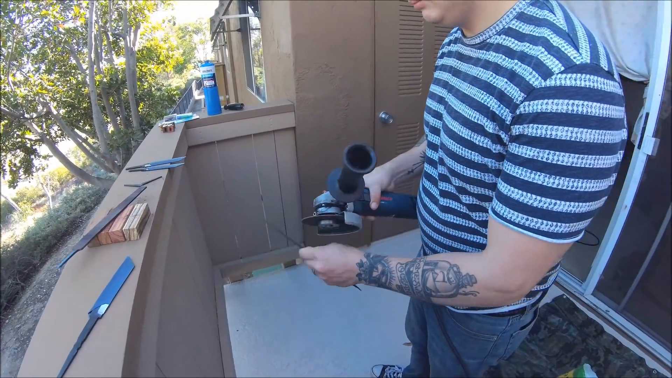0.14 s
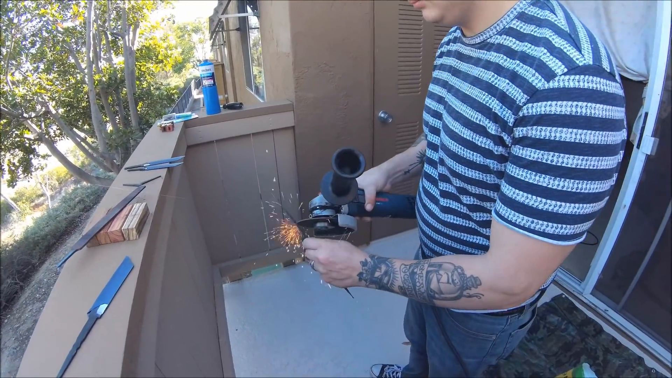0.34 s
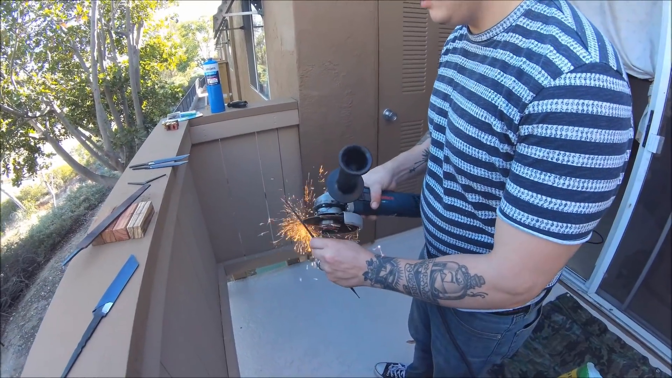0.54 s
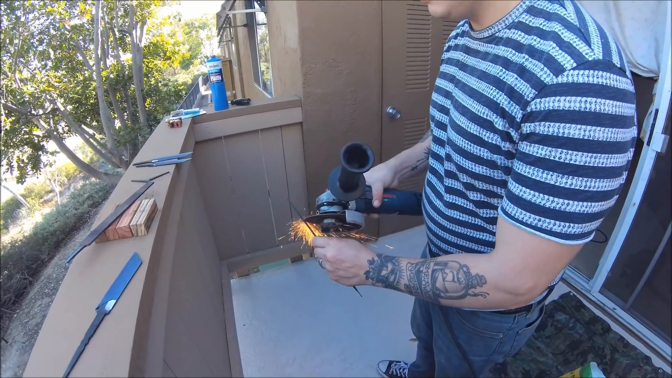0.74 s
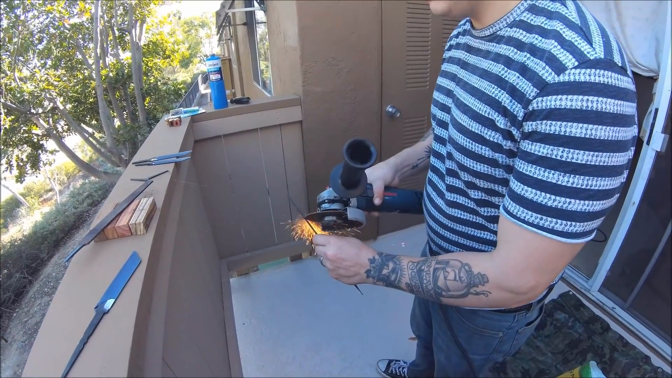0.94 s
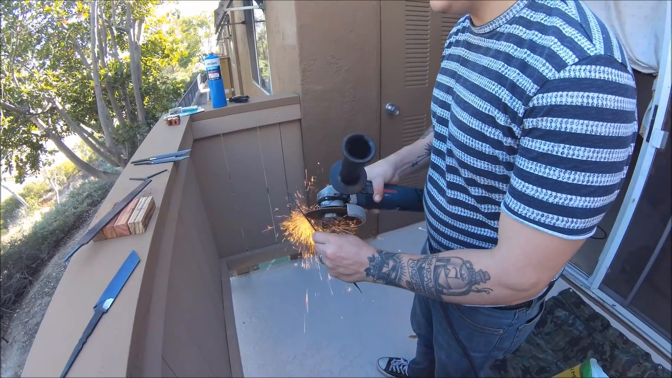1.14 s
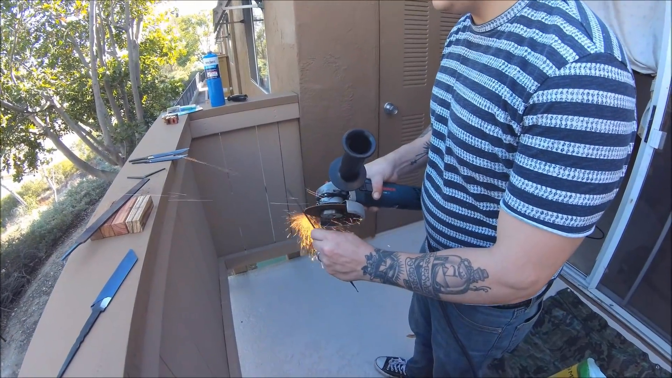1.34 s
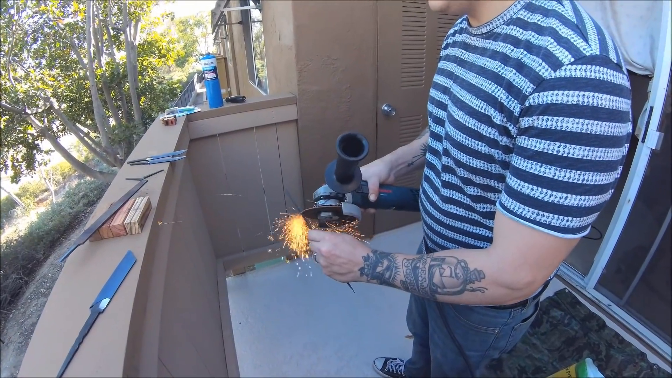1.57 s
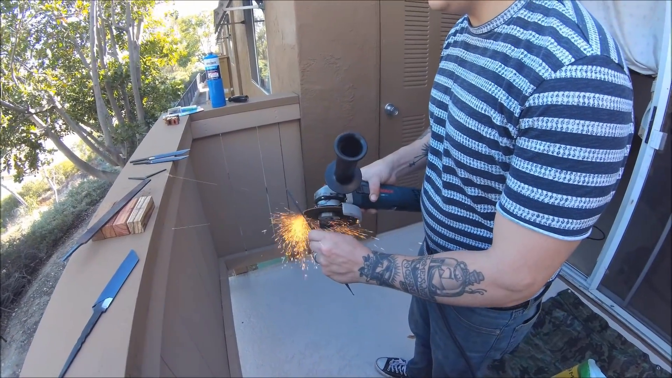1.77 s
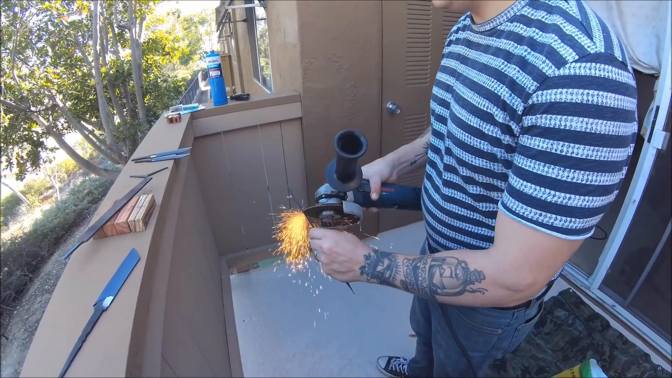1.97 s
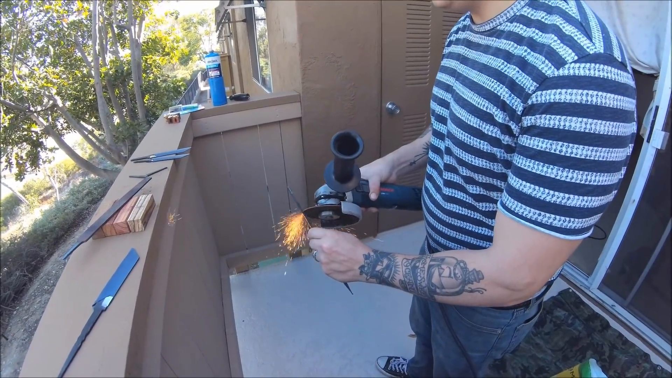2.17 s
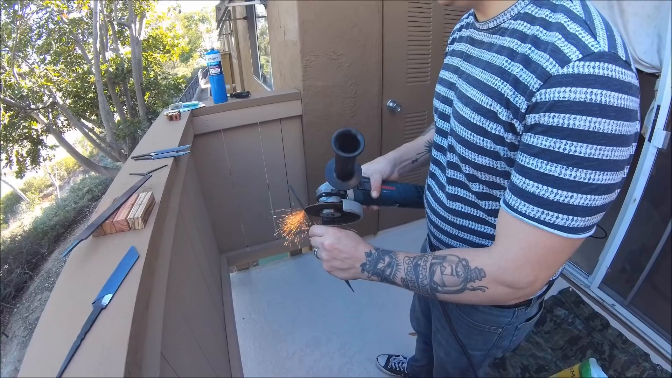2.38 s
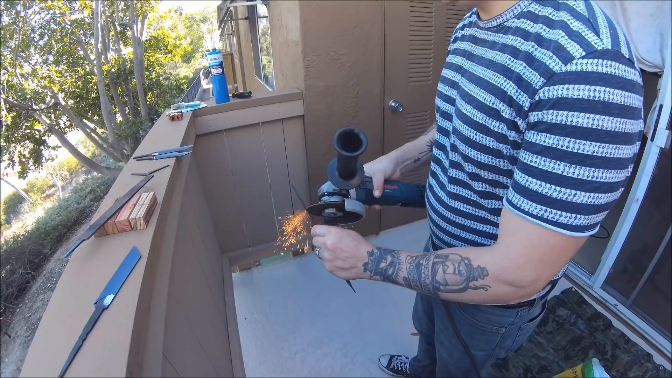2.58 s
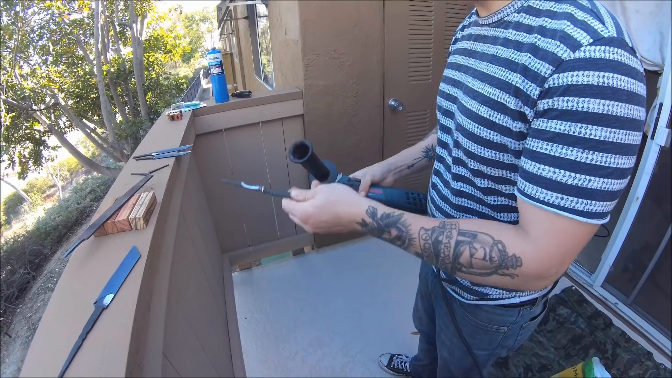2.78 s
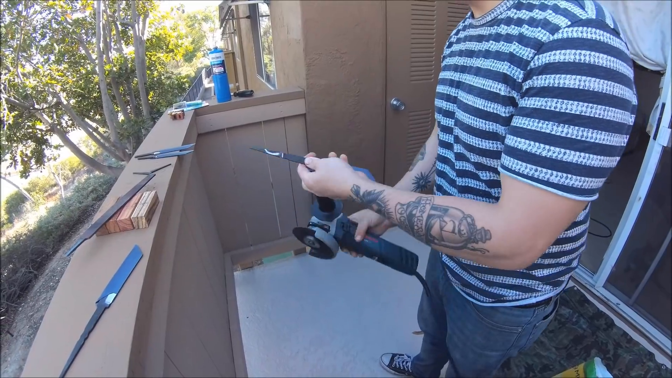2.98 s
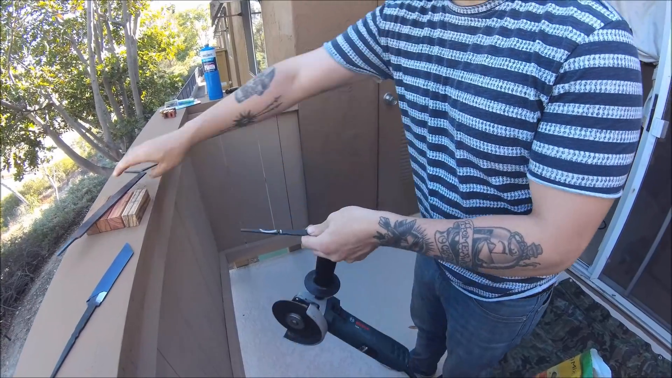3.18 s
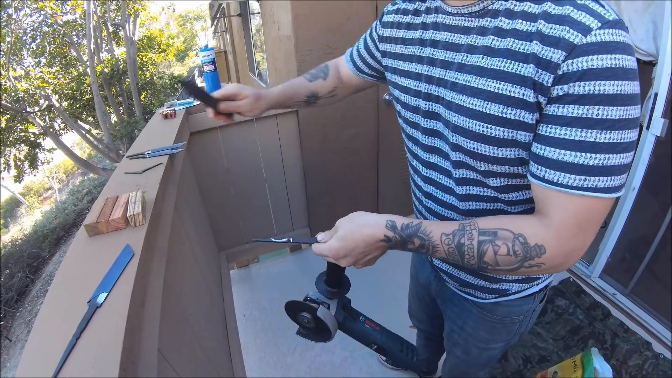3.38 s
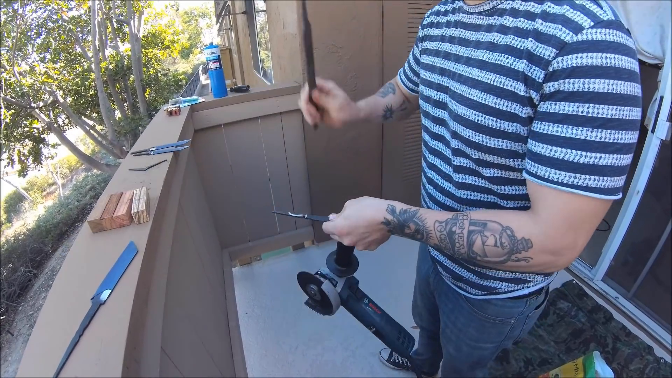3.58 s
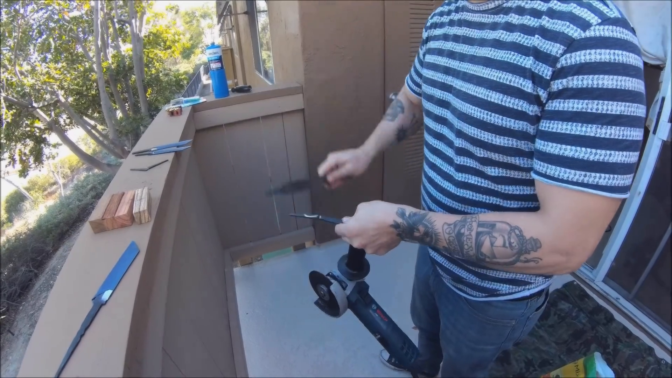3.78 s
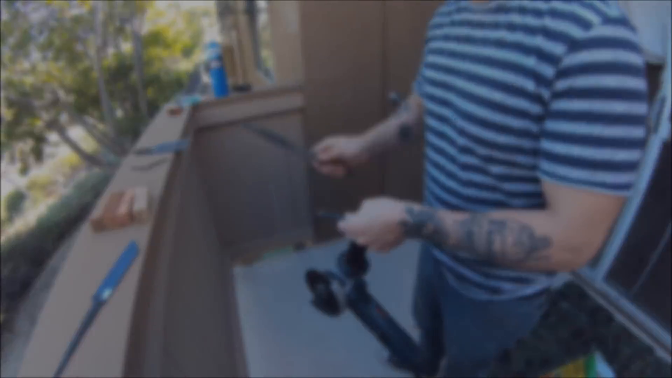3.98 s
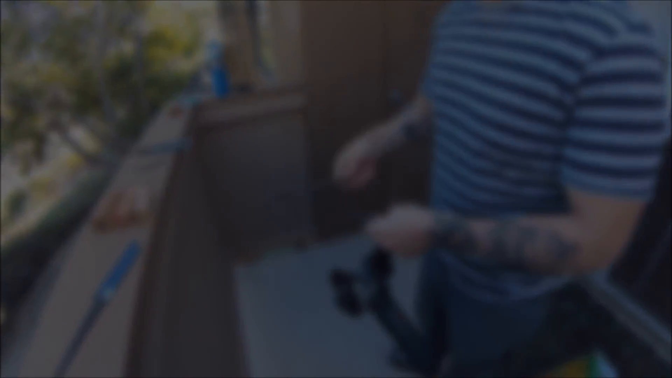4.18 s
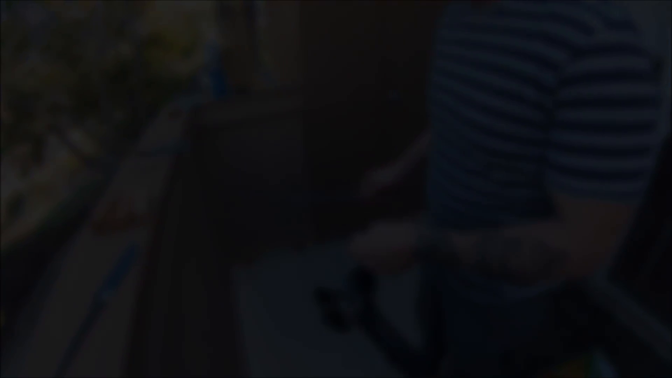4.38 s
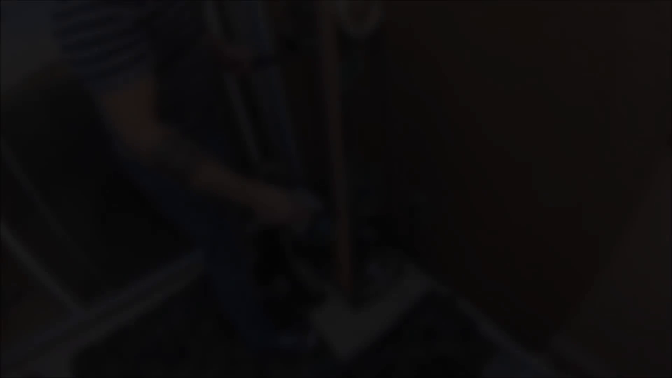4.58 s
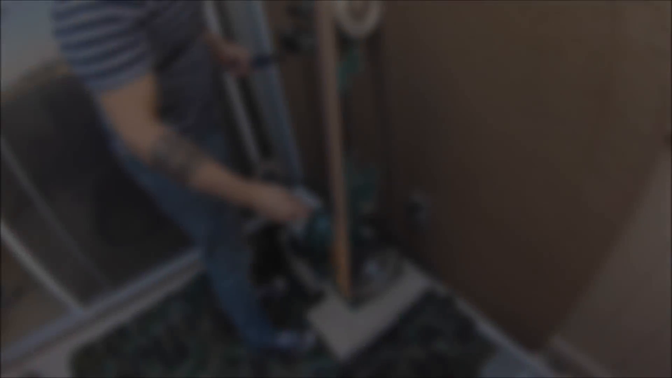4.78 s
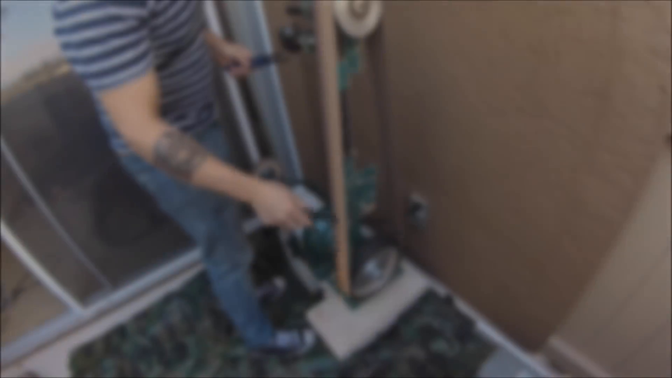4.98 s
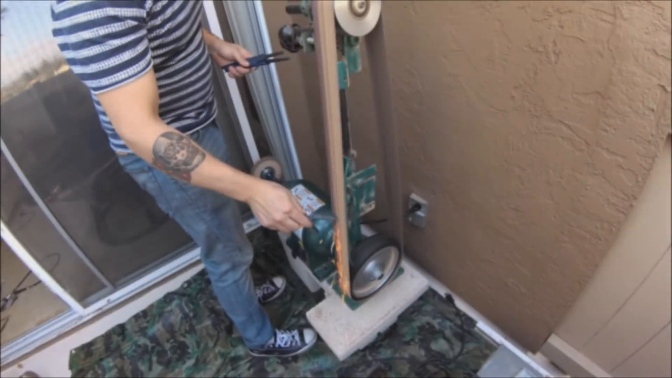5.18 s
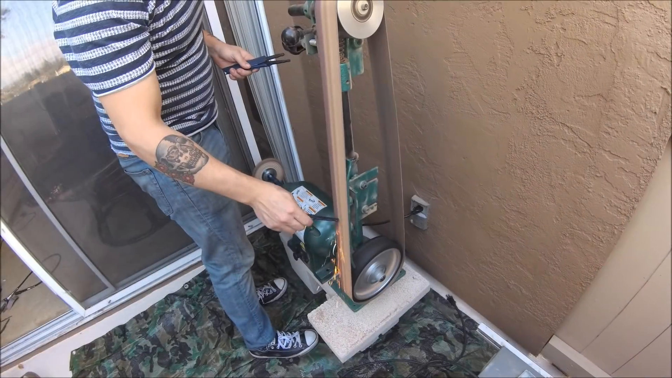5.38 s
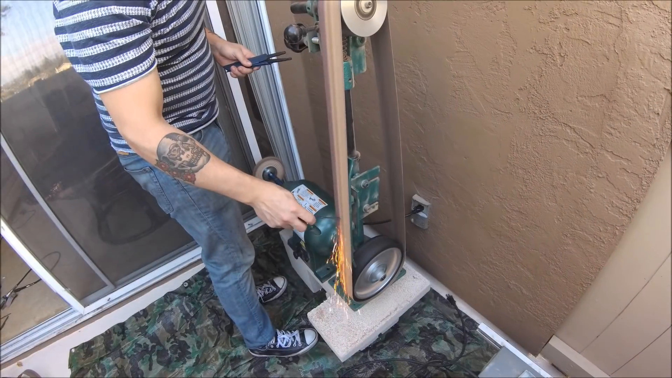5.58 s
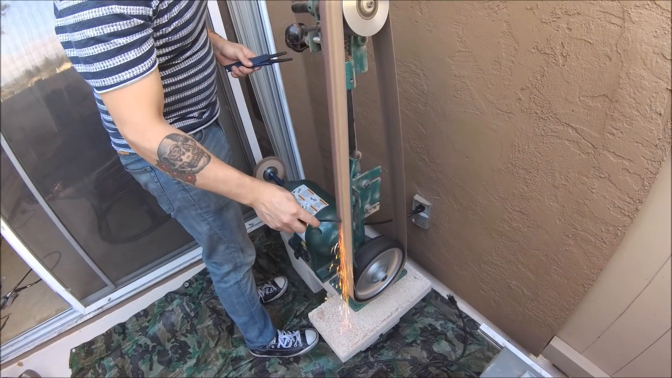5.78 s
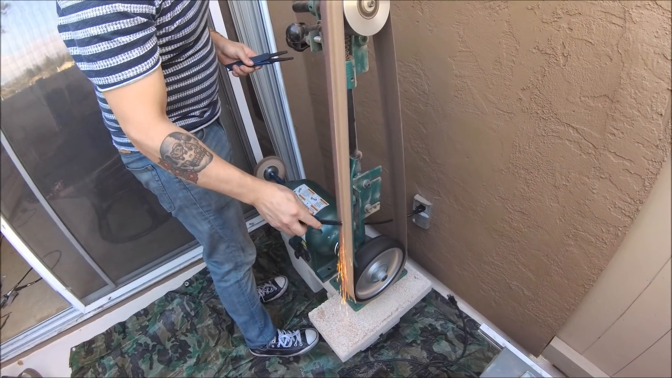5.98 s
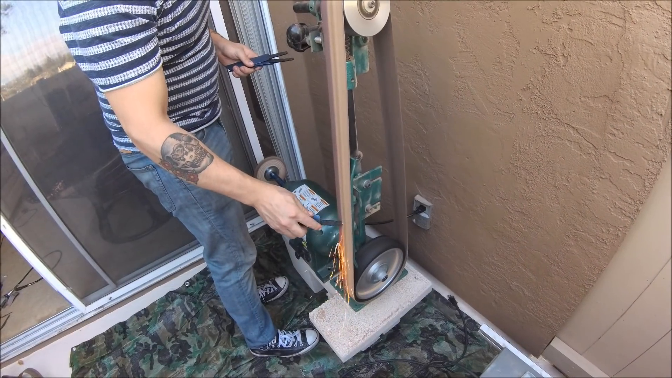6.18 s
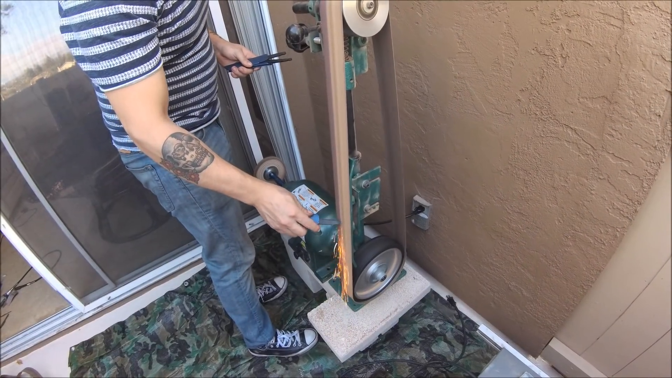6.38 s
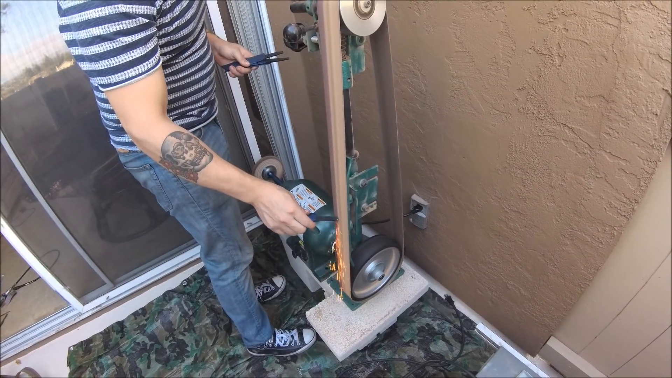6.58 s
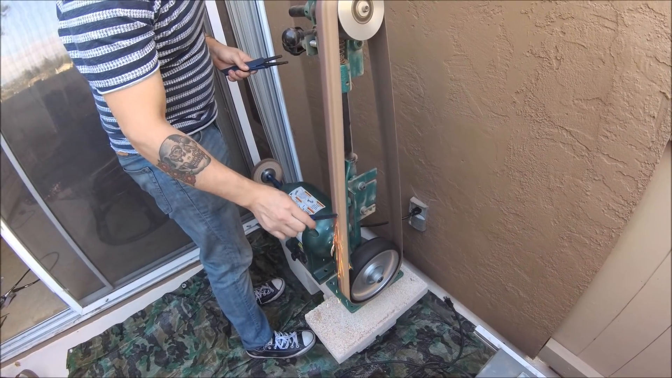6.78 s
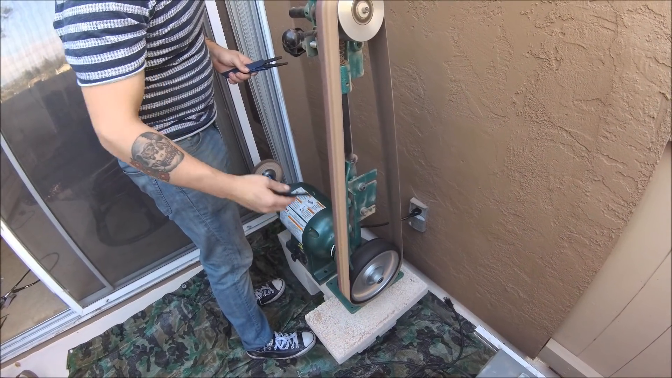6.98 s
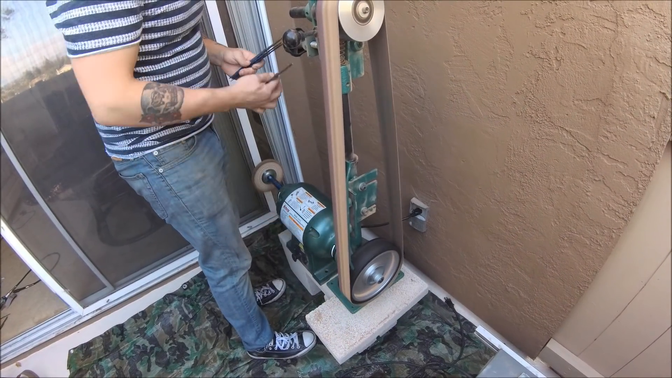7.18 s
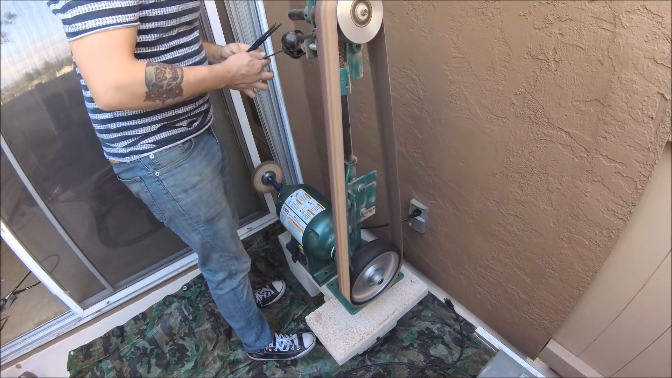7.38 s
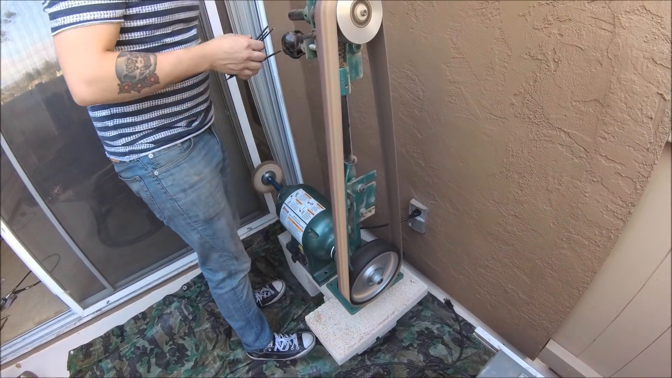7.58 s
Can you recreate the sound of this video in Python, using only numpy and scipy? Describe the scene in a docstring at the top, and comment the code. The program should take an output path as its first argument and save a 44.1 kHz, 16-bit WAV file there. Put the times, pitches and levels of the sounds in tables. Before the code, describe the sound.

Roaring, sizzling metal cutting runs down in a falling whistle, quick bright ticks sound outdoors, then a hissing belt grinder sings against steel and runs free.

```python
"""Angle grinder, ticks and belt grinder

On a small balcony an angle grinder bites into steel with a whine, roar and sizzle, then is switched off and runs down.
Its tones follow the armature's speed; the cutting and the coasting are coloured noise.
Sharp ticks and two dull clacks are noise bursts with a short ring, over soft open air, a faint hum and a distant bird.
A belt grinder fades in as wheel tones and noise; steel roars and sings on its belt, is lifted, and the belt runs on."""
import sys
import numpy as np
from scipy import signal
from scipy.fft import rfft, irfft
from scipy.io import wavfile
from scipy.ndimage import uniform_filter1d

SR = 44100
rng = np.random.default_rng(int(sys.argv[2]) if len(sys.argv) > 2 else 0)


def unload_wav(signal):
    """Save mono or channel-first audio to the path in sys.argv[1] as 16-bit WAV at rate SR, clipped to [-1, 1]."""
    wavfile.write(
        sys.argv[1],
        SR,
        np.round(np.clip(np.atleast_2d(signal).T, -1, 1) * 32767).astype(np.int16),
    )


N = 336924
T = np.arange(N) / SR
FREQ = np.fft.rfftfreq(N, 1 / SR)
TOP_HZ = 15750  # upper edge of the whole sound


def undb(db):
    """Decibels to gain."""
    return 10 ** (np.asarray(db) / 20)


def curve(rows, rise=600, fall=600):
    """Gain over time from (time [s], level [dB]) rows, dying away outside them at rise and fall [dB/s]."""
    s, db = np.transpose(rows)
    before = rise * np.maximum(s[0] - T, 0)
    after = fall * np.maximum(T - s[-1], 0)
    return undb(np.interp(T, s, db) - before - after)


def swells(rows):
    """Gain of smooth swells and dips from (middle [s], length [s], change [dB]) rows."""
    return undb(sum(db * np.cos(np.pi * np.clip((T - s) / length, -.5, .5)) ** 2 for s, length, db in rows))


def across(points):
    """Join (frequency [Hz], value) points on a log-frequency axis."""
    f, value = np.transpose(points)
    return np.interp(np.log(FREQ + 1), np.log(f), value)


def bell(hz, centre_hz, width):
    """Resonance curve: 1 at the centre, a half at half the width [Hz] to either side."""
    return 1 / (1 + (2 * (hz - centre_hz) / width) ** 2)


def resonances_db(rows):
    """Boost in dB over frequency from (centre [Hz], width [Hz], boost [dB]) resonances."""
    return sum(db * bell(FREQ, hz, width) for hz, width, db in rows)


def walk(rate):
    """Smooth random drift with a spread near 1, taking rate [Hz] new values a second."""
    step = int(SR / rate)
    count = N // step + 2
    line = np.interp(T, np.arange(count) * step / SR, rng.standard_normal(count))
    return np.sqrt(2) * uniform_filter1d(line, step)


def grit(colour_db, like, band, grain_db=0., gate=1.):
    """Stereo hiss of countless grain strikes of uneven size; the centre has rms 1 within the band [Hz]."""
    sizes = undb(grain_db * rng.exponential(size=N))
    strikes = rng.standard_normal((2, N)) * sizes * gate
    mid, side = rfft(strikes) * undb(colour_db)
    # likeness of left and right: 0 is unrelated, 1 is identical
    like = np.clip(like, 0, 1)
    mid, side = mid * np.sqrt(1 + like), side * np.sqrt(1 - like)
    inside = (FREQ > band[0]) & (FREQ < band[1])
    return irfft([mid + side, mid - side], N) / np.std(irfft(mid * inside, N))


def place(x, pan_db):
    """Lean a sound left (positive) or right."""
    return x * undb(np.array([[pan_db], [-pan_db]]) / 2)


def add(out, s, sound):
    """Mix a short sound in at a time [s]."""
    start = int(s * SR)
    out[:, start:start + sound.shape[1]] += sound


# colour of the outdoor air: (frequency [Hz], level [dB])
AIR_COLOUR = [(20, -75), (160, -62), (250, -20), (340, -4.5), (500, -3.5), (1300, -0.5), (3000, 2.5),
              (6000, -0.5), (8000, -8.5), (11000, -9), (16000, -15)]


def open_air(air_db=-38.5):
    """Soft outdoor air: almost steady noise, alike in both ears."""
    return grit(across(AIR_COLOUR), 1.0, (200, 15000)) * undb(air_db + 0.53 * walk(7))


# calls of the distant bird: (time [s], length [s], start pitch [Hz], end pitch [Hz], level [dB])
BIRD_CALLS = [(3.49, .11, 680, 880, -46), (3.49, .09, 1430, 1320, -47), (3.68, .11, 1390, 1320, -43),
              (3.7, .22, 770, 800, -54), (3.89, .1, 1400, 1450, -46), (4.02, .11, 1430, 1330, -43)]


def bird(overtone_db=-8):
    """Slurred whistles of a distant bird: gliding tones with one overtone."""
    out = np.zeros(N)
    for s, length, start_hz, end_hz, db in BIRD_CALLS:
        progress = np.clip((T - s) / length, 0, 1)
        phase = 2 * np.pi * np.cumsum(start_hz + (end_hz - start_hz) * progress) / SR
        tone = np.sin(phase) + undb(overtone_db) * np.sin(2 * phase)
        out += undb(db) * np.sqrt(2) * np.sin(np.pi * progress) * tone
    return out


# partials of the distant hum: (frequency [Hz], level [dB])
HUM_PARTIALS = [(393, -61), (522, -61), (646, -66), (776, -60), (1174, -59)]


def far_hum(start_s=3.72, end_s=4.1, waver_db=3.0):
    """A faint hum in the distance comes and goes, its partials wavering separately in level, together in pitch."""
    time = np.cumsum(1 + .004 * walk(12)) / SR
    hum = 0
    for hz, db in HUM_PARTIALS:
        hum = hum + undb(db + waver_db * walk(12)) * np.sqrt(2) * np.sin(2 * np.pi * hz * time)
    return hum * curve([(start_s, 0), (end_s, 0)], rise=56, fall=40)


WHEEL_HZ = 52.45  # average speed of the drive wheel, turns per second
# drive wheel harmonics, running free: (multiple of its speed, level [dB])
WHEEL_HARMONICS = [(4, -57), (5, -51.5), (6, -62), (8, -55.5), (9, -54.5), (10, -57), (11, -60), (13, -53),
                   (15, -62), (17, -63), (22, -63), (38, -56), (40, -60)]


def wheel_hum(load, damped_db=-9):
    """The drive wheel's hum and its angle; the load of the steel damps the hum."""
    turn = 2 * np.pi * WHEEL_HZ * np.cumsum(1 + 0.00099 * walk(6)) / SR
    hum = 0
    for k, db in WHEEL_HARMONICS:
        tone = np.sin(k * turn + rng.uniform(0, 2 * np.pi))
        hum = hum + undb(db + 1.1 * walk(8.5)) * np.sqrt(2) * tone
    return hum * undb(damped_db * load), turn


# the blade sings as its grip and angle change: (start [s], end [s], centre [Hz], width [Hz], level [dB])
BLADE_SONG = [(4.65, 5.25, 9600, 300, -33.5), (5, 5.801, 13600, 400, -35), (5, 5.7, 12020, 350, -40),
              (5.65, 6.8, 8980, 120, -33), (5.7, 6.85, 7380, 130, -34.5), (6.0, 6.7, 13320, 250, -39),
              (6.45, 7.03, 13680, 500, -34)]


def blade_song():
    """The belt's grains keep narrow resonances of the blade ringing, each swelling and dying."""
    out = 0
    for start, end, hz, width, db in BLADE_SONG:
        progress = np.clip((T - start) / (end - start), 0, 1)
        swell = np.sqrt(np.abs(np.sin(np.pi * progress)))
        ringing = grit(20 * np.log10(bell(FREQ, hz, width)), .4, (0, TOP_HZ))
        out = out + undb(db) * swell * ringing
    return out


# colour of the free-running belt: (frequency [Hz], level [dB])
BELT_COLOUR = [(18, -62), (30, -32), (108, -21), (130, -20.5), (197, -16.5), (263, -17), (292, -19),
               (691, -14), (852, -15.5), (1290, -20), (2020, -19), (3590, -13.5), (4310, -7), (7650, -2.5),
               (15500, -4)]
# idler wheels under the running belt: (centre [Hz], width [Hz], boost [dB])
IDLER_RESONANCES = [(4270, 290, 2.5), (6230, 380, 4.5), (7470, 180, 7), (12100, 400, 3)]
# likeness of left and right in the belt noise: (frequency [Hz], likeness [0-1])
BELT_LIKENESS = [(3000, 0.9), (6500, 0.95), (10000, 0.25), (14000, .14)]


def running_belt(wobble, load, belt_db=-24, damped_db=-3, flicker_db=0.5):
    """The belt hisses over its idlers, pulsing with the wheel; the steel's load damps it."""
    colour_db = across(BELT_COLOUR) + resonances_db(IDLER_RESONANCES)
    belt = grit(colour_db, across(BELT_LIKENESS), (30, 15500), gate=wobble) * undb(flicker_db * walk(40))
    return undb(belt_db + damped_db * load) * place(belt, -.3)


# how hard the steel is held on the belt until it is lifted at the last row: (time [s], pressure [dB])
STEEL_PRESSURE = [(4.9, -0.5), (5.3, 0.5), (5.8, -1.5), (6.75, 1.5), (6.92, 2.5), (6.98, 0)]
# colour of the grinding roar: (frequency [Hz], level [dB])
GRIND_ROAR_COLOUR = [(20, 2.5), (100, 0.85), (1000, 0.65), (3000, 2.1), (5000, 1.2), (9000, 1.2),
                     (16000, 3.8)]
# colour of the grinding hiss: (frequency [Hz], level [dB])
GRIND_HISS_COLOUR = [(2500, -22.5), (4500, -7), (6200, -0.5), (8000, -3.5), (9500, 0), (10500, -5.5),
                     (14000, -3.5), (16000, -7)]
# the platen behind the belt: (centre [Hz], width [Hz], boost [dB])
PLATEN_RESONANCES = [(6250, 120, 0), (6540, 150, 2), (7150, 90, 5), (7560, 130, 7), (11100, 300, 6.5),
                     (12000, 200, 2)]
# likeness of left and right in the grinding hiss: (frequency [Hz], likeness [0-1])
GRIND_LIKENESS = [(6000, 0.41), (10000, 0.41), (14000, .2)]
# levels at 0 dB of pressure
GRIND_ROAR_DB, GRIND_HISS_DB = -37.5, -25.5


def belt_grinding(wobble, roar_power=0.54):
    """Steel pressed on the belt roars, hisses through the platen and sings; the roar follows pressure less."""
    pressure = curve(STEEL_PRESSURE, rise=0, fall=660)
    roar = grit(across(GRIND_ROAR_COLOUR), 0.011, (100, 2500), grain_db=2.0)
    roar = roar * undb(GRIND_ROAR_DB + 0.5 * walk(30)) * pressure ** roar_power
    colour_db = across(GRIND_HISS_COLOUR) + resonances_db(PLATEN_RESONANCES)
    hiss = grit(colour_db, across(GRIND_LIKENESS), (5000, 15000), grain_db=1.4, gate=wobble)
    hiss = hiss * undb(GRIND_HISS_DB + 0.84 * walk(30)) * pressure
    return place(roar, -1.1) + place(hiss + blade_song(), 3.1)


def belt_grinder(fade_start_s=3.8, fade_end_s=5.18, runout=0.04):
    """Wheel, belt and held steel fade in evenly; the belt noise and grinding hiss pulse once a wheel turn."""
    lift_s = STEEL_PRESSURE[-1][0]
    load = np.clip((lift_s - T) / .04, 0, 1)
    hum, turn = wheel_hum(load)
    wobble = 1 + runout * np.sin(turn)
    fade = np.clip((T - fade_start_s) / (fade_end_s - fade_start_s), 0, 1)
    return fade * (running_belt(wobble, load) + hum + belt_grinding(wobble))


# modes that every tick and clack rings with: (multiple of the ring pitch, level [dB], t60 [s])
RING_MODES = [(.93, -10, 0.031), (.99, -2.5, 0.022), (1.04, -6, 0.021), (1.31, -18, 0.027),
              (2.0, -12, .025), (2.8, -9, .03)]


def knock(crack_db, hz, spread, t60, body_db, ring_hz, ring_db, thud_db,
          ring_rise=0.0022, thud_t60=0.017, attack=0.0005, body_hz=3500, body_oct=2.2):
    """One contact: a bright crack over a broad knock, a hollow ring that builds a moment later, and a small thud."""
    size = 4096
    t, f = np.arange(size) / SR, np.fft.rfftfreq(size, 1 / SR) + 1

    def envelope(t60, rise):
        """Quick rise and exponential decay, peaking at 1."""
        shape = (1 - np.exp(-t / rise)) * np.exp(-np.log(1000) * t / t60)
        return shape / shape.max()

    def hump(hz, octaves):
        """Broad spectral hump, cut off at the top edge."""
        return np.exp(-(np.log2(f / hz) / octaves) ** 2) * (f < TOP_HZ)

    def burst(gain, t60, width):
        """Decaying stereo noise of even loudness whatever its colour."""
        mid, side = irfft(rfft(rng.standard_normal((2, size))) * gain)
        shape = envelope(t60, attack)
        loudness = np.sqrt(np.average(mid ** 2, weights=shape ** 2))
        # 0.77 trims crack, body and thud alike against the ring
        return 0.77 * np.array([mid + width * side, mid - width * side]) * shape / loudness

    crack = undb(crack_db) * burst(hump(hz, spread), t60, 0.33)
    body = undb(body_db) * burst(hump(body_hz, body_oct), t60, 0.66)
    ring = 0
    for ratio, db, decay in RING_MODES:
        tone = np.sin(2 * np.pi * (ratio * ring_hz * t + rng.random()))
        ring = ring + undb(ring_db + db) * envelope(decay, ring_rise) * tone
    thud = undb(thud_db) * burst(bell(f, 200, 1200), thud_t60, .8)
    return crack + body + ring + thud


TICK_HZ = 13200  # centre of a tick's crack
# sharp ticks, levels before the knock's trim:
# (time [s], crack level [dB], firmness of contact [0-1], thud level [dB], ring pitch [Hz])
TICK_HITS = [(3.5977, -8.5, 0.14, -36, 2850), (3.6832, -15, 0.68, -44, 2750),
             (3.7726, -10.5, 0.95, -33, 2800), (3.8576, -10.5, 1, -45, 2774),
             (3.9405, -10.5, 0.95, -45.5, 2780), (4.0231, -14.5, 0.9, -29.5, 2750),
             (4.115, -12.5, 0.1, -35, 2750), (4.329, -21.5, 1.0, -55, 2700)]


def ticks():
    """A light touch gives only a thin crack; a firm one is broader, longer and wakes the ring."""
    out = np.zeros((2, N))
    for s, db, firm, thud_db, ring_hz in TICK_HITS:
        tick = knock(db, TICK_HZ, spread=0.29 + 0.36 * firm, t60=0.017 + 0.024 * firm,
                     body_db=db - 15.0 + 6.4 * firm, ring_hz=ring_hz,
                     ring_db=db - 33.0 + 26.5 * firm, thud_db=thud_db)
        add(out, s, tick)
    return out


# duller clacks, crack levels before the knock's trim:
# (time [s], crack level [dB], crack centre [Hz], ring pitch [Hz], ring level [dB])
CLACK_HITS = [(4.568, -12.7, 7000, 2350, -29), (4.824, -15, 4850, 3850, -23)]


def clacks():
    """Two duller contacts, their cracks centred lower than the ticks'."""
    out = np.zeros((2, N))
    for s, db, hz, ring_hz, ring_db in CLACK_HITS:
        clack = knock(db, hz, spread=0.65, t60=0.034, body_db=db - 3.5,
                      ring_hz=ring_hz, ring_db=ring_db, thud_db=-51.0)
        add(out, s, clack)
    return out


# time of switching off, and time constant of the exponential loss of speed
OFF_S, RUN_DOWN_S = 2.886, .377
WORK_HZ = 600  # working speed of the armature, turns per second
# armature under power, sagging as the disc is pressed harder: (time [s], turns per second [Hz])
MOTOR_SPEED = [(0, 636), (.2, 620), (.5, 653), (.58, 645), (.66, 642), (.76, 628), (.98, 612.5),
               (1.17, 603.5), (1.28, 584.5), (1.37, 605), (1.46, 605.5), (1.64, 592.9), (1.77, 592.8),
               (1.9, 580.5), (2.03, 579.8), (2.14, 575.8), (2.24, 591), (2.36, 599), (2.45, 599.5),
               (2.6, 614), (2.87, 606)]


def powered_hz():
    """Armature speed as set by the load alone."""
    return np.interp(T, *np.transpose(MOTOR_SPEED))


def motor_turns():
    """Armature speed and the turns it has made; it trembles with the load and runs down once switched off."""
    hz = powered_hz() * np.exp(-np.maximum(T - OFF_S, 0) / RUN_DOWN_S)
    hz = hz * (1 + .0002 * walk(70))
    return hz, np.cumsum(hz) / SR


# air resonances between guard and coasting disc: (centre [Hz], width [Hz], boost [dB])
GUARD_RESONANCES = [(3064, 280, 4), (4700, 280, 2), (7900, 350, 3), (9400, 400, 2), (12450, 500, 1),
                    (13400, 400, 2)]
# colour of the air rush: (frequency [Hz], level [dB])
RUSH_COLOUR = [(200, -50), (400, -37), (1200, -8), (2300, -11), (3100, -1.5), (3800, 0.5), (4700, 0.5),
               (5800, -2), (6600, 0.5), (7500, -5), (10000, -15)]
# colour of the gears' rustle: (frequency [Hz], level [dB])
COAST_HISS_COLOUR = [(3000, -58), (6000, -11.5), (8600, 1), (10500, -0.5), (11500, 0), (13000, 3.5),
                     (16000, 3.5)]
# the coasting hiss dips briefly and swells back: (middle [s], length [s], change [dB])
COAST_SWELLS = [(3.175, 0.12, -4.5), (3.25, .16, 3)]
# levels at the working speed
RUSH_DB, COAST_HISS_DB = -19.5, -12.5


def coasting(hz, full_s=2.992, end_s=3.5, rush_power=1.55, hiss_power=1.41):
    """Air rushes round the free disc and the gears rustle under the guard; both fall with a power of speed."""
    ring_db = resonances_db(GUARD_RESONANCES)
    speed = hz / WORK_HZ
    rush = grit(across(RUSH_COLOUR) + ring_db, 1.0, (2800, 6000), grain_db=1.5)
    rush = rush * undb(RUSH_DB + 0.86 * walk(45)) * speed ** rush_power
    hiss = grit(across(COAST_HISS_COLOUR) + ring_db, 0.935, (8000, 15500), grain_db=2.0)
    hiss = hiss * undb(COAST_HISS_DB + 1.0 * walk(70)) * speed ** hiss_power * swells(COAST_SWELLS)
    return (rush + hiss) * curve([(full_s, 0), (end_s, 0)], rise=74, fall=66)


FAN_ORDER = 4  # whistles per armature turn
# before the vents' boost: level under power, level as the run-down starts, its fall, and when it stops speaking
FAN_DB, FAN_FREE_DB, FAN_FALL_DB_S, FAN_END_S = -42.5, -26, 39, 3.155
# the whistle flares under power: (middle [s], length [s], change [dB])
WHISTLE_FLARES = [(.22, .24, 6), (.56, .3, 5), (1.0, 0.41, 5)]


def fan(hz, turns, onset_s=0.045, vent_hz=1930, vent_width=200, vent_db=9.5,
        octave_db=0.5, guard_hz=3140, guard_width=400):
    """The fan whistles faintly under power, then sings out as its pitch falls through the vents' resonance."""
    blades = 2 * np.pi * FAN_ORDER * turns + 0.4 * walk(120)
    # the rough octave speaks up only as it falls through the guard's resonance
    octave_gain = undb(octave_db) * bell(2 * FAN_ORDER * hz, guard_hz, guard_width)
    octave = octave_gain * np.sin(2 * blades + .6 * walk(400))
    whistle = np.sqrt(2) * (np.sin(blades) + octave) * undb(1.3 * walk(90))
    powered = curve([(0, FAN_DB), (OFF_S, FAN_DB)]) * undb(3.1 * walk(8.7)) * swells(WHISTLE_FLARES)
    free = curve([(OFF_S + onset_s, FAN_FREE_DB), (FAN_END_S, FAN_FREE_DB)], rise=780, fall=220)
    free = free * undb(-FAN_FALL_DB_S * (T - OFF_S))
    vents = undb(vent_db * bell(FAN_ORDER * hz, vent_hz, vent_width))
    return whistle * (powered + free) * vents


# resonances of disc, guard and gear case: (centre [Hz], width [Hz], level [dB])
CASE_RESONANCES = [(4770, 120, -8), (8890, 60, -5), (9170, 110, -2), (10440, 100, -3), (10670, 70, 0),
                   (10750, 70, 1), (11270, 90, 1), (11390, 90, 0), (11860, 70, 7), (12080, 70, 3),
                   (12620, 90, 3), (13335, 70, 7), (13550, 80, 0), (14060, 140, 2), (14230, 50, 3),
                   (14480, 130, 0), (15050, 130, 2), (15420, 100, 3), (15680, 120, 1)]
# relative strength of the armature's harmonics: (multiple of its speed, level [dB])
ARMATURE_HARMONICS = [(8, 0), (15, 0), (17, -4), (18, 0), (19, 0), (20, 0), (21, -1), (22, -12), (23, 0),
                      (24, -1), (25, -4), (26, 0), (27, -2)]
# the case rings fully only while the disc is pressed firmly into the steel
FIRM_START_S, FIRM_END_S = .55, 2.55
# whine gain at the working speed, its growth as load drags the speed down, its fall as the pressure eases
WHINE_DB, WHINE_DB_PER_HZ, WHINE_FALL_DB_S = -30.5, 0.05, 42


def whine(hz, turns, flutter_db=1.2):
    """Armature harmonics light up as they slide through the resonances of the case, louder under load."""
    grid = np.arange(0, SR / 2, 10)
    response = np.sqrt(sum(undb(db) ** 2 * bell(grid, f, w) for f, w, db in CASE_RESONANCES))
    out = np.zeros((2, N))
    for k, db in ARMATURE_HARMONICS:
        # small phase offsets between left and right
        side_phase = rng.normal(0, 0.14, (2, 1))
        level = np.interp(k * hz, grid, response) * undb(db + flutter_db * walk(14.1))
        out += level * np.sin(2 * np.pi * k * turns + side_phase)
    load = undb(WHINE_DB_PER_HZ * (WORK_HZ - powered_hz()))
    firm = curve([(FIRM_START_S, WHINE_DB), (FIRM_END_S, WHINE_DB)], rise=25, fall=WHINE_FALL_DB_S)
    return np.sqrt(2) * out * load * firm


# colour of the cutting roar: (frequency [Hz], level [dB])
ROAR_COLOUR = [(20, 0.5), (60, -0.5), (500, -0.5), (1500, -0.3), (2500, 1), (5000, 1.5), (8000, 1.6),
               (11000, 1), (16000, 1)]
# colour of the cutting sizzle: (frequency [Hz], level [dB])
SIZZLE_COLOUR = [(2000, -28), (5000, -17), (8000, -9.5), (10000, -1.5), (12000, 0.5), (14000, -0.5),
                 (16000, -1)]
# likeness of left and right in the sizzle: (frequency [Hz], likeness [0-1])
SIZZLE_LIKENESS = [(4000, .5), (10000, .62), (16000, 0.55)]
# the disc bites harder or eases for a moment: (middle [s], length [s], change of sizzle [dB])
DISC_BITES = [(.28, .12, 4), (.34, .16, -5), (1.7, 0.16, 3), (2.05, .24, 1.5), (2.7, 0.16, -5),
              (2.82, 0.18, 3)]
# average levels, and when the steel starts to leave the disc
ROAR_DB, SIZZLE_DB, LIFT_S = -28, -22, 2.902


def cutting(turns, gear_ratio=3.4, runout=0.081, unsteady_db=1.0, release_s=.24):
    """Abrasive grains tear the steel: a wide roar and a sizzle that pulses with each turn of the disc."""
    bite = 1 + runout * np.sin(2 * np.pi * turns / gear_ratio)
    roar = grit(across(ROAR_COLOUR), .02, (150, 2000), grain_db=1.67) * undb(ROAR_DB + 0.45 * walk(40.28))
    sizzle = grit(across(SIZZLE_COLOUR), across(SIZZLE_LIKENESS), (10000, 15500), grain_db=1.5, gate=bite)
    sizzle = sizzle * undb(SIZZLE_DB + 1.8 * walk(70) + unsteady_db * walk(27.5)) * swells(DISC_BITES)
    # both die quickly as the steel leaves the disc
    contact = np.clip(1 - (T - LIFT_S) / release_s, 0, 1) ** 3
    return (place(roar, -0.35) + place(sizzle, 0.71)) * contact


def scene():
    """Open air, bird and far hum, belt grinder, ticks and clacks, and the angle grinder."""
    hz, turns = motor_turns()
    background = open_air() + bird() + far_hum()
    angle_grinder = coasting(hz) + fan(hz, turns) + whine(hz, turns) + cutting(turns)
    return background + belt_grinder() + ticks() + clacks() + angle_grinder


def record(dry):
    """A steep low-pass cuts the top."""
    low_pass = signal.ellip(12, .1, 70, TOP_HZ, fs=SR, output="sos")
    return signal.sosfilt(low_pass, dry, axis=-1)


dry = scene()
out = record(dry)
unload_wav(out)
```